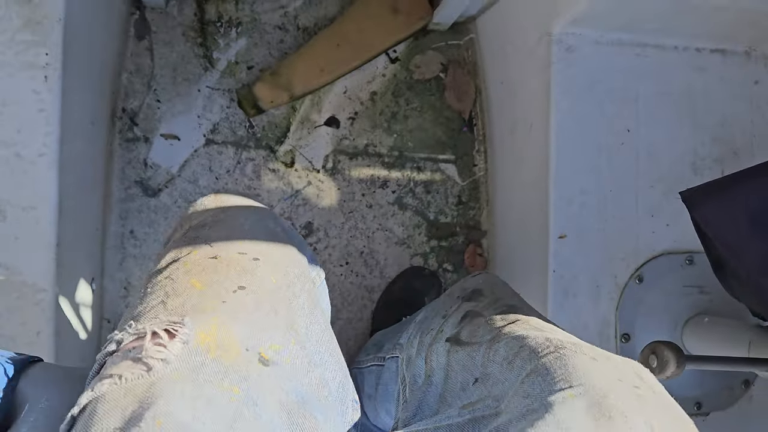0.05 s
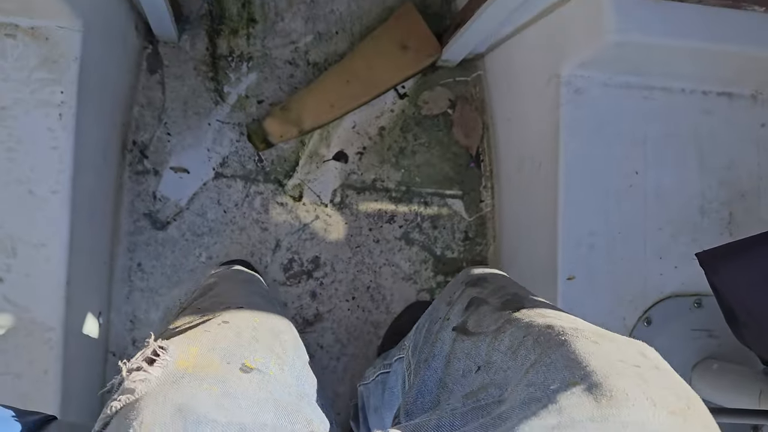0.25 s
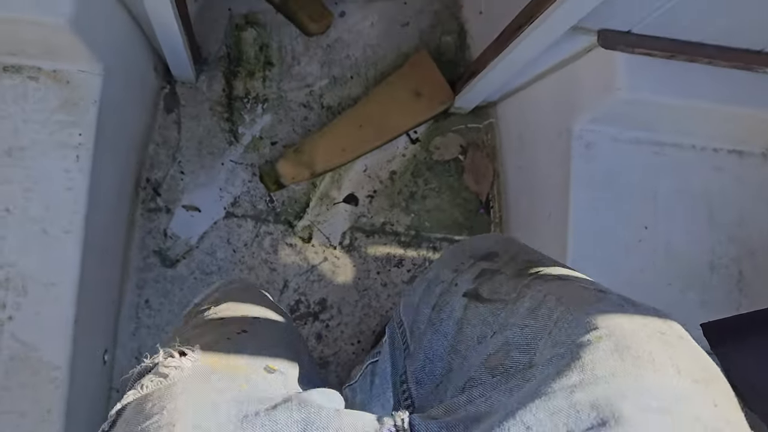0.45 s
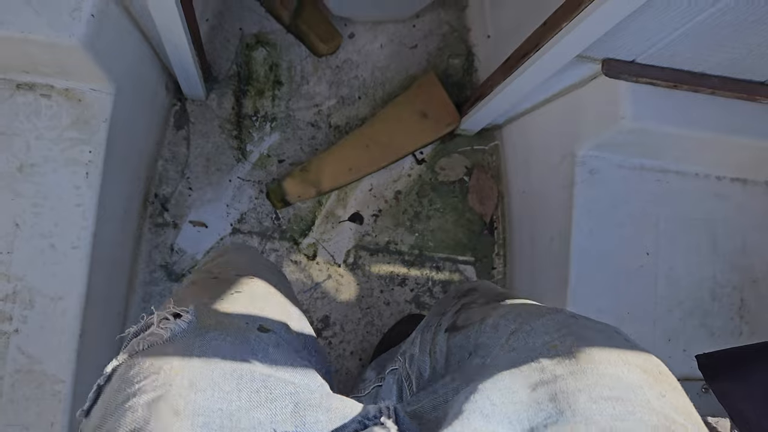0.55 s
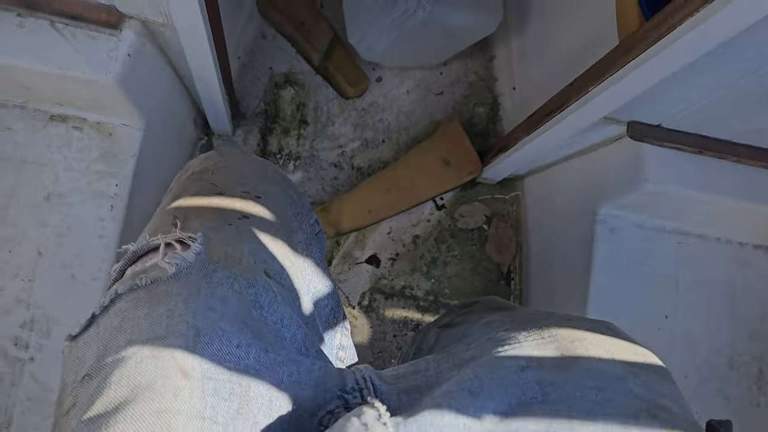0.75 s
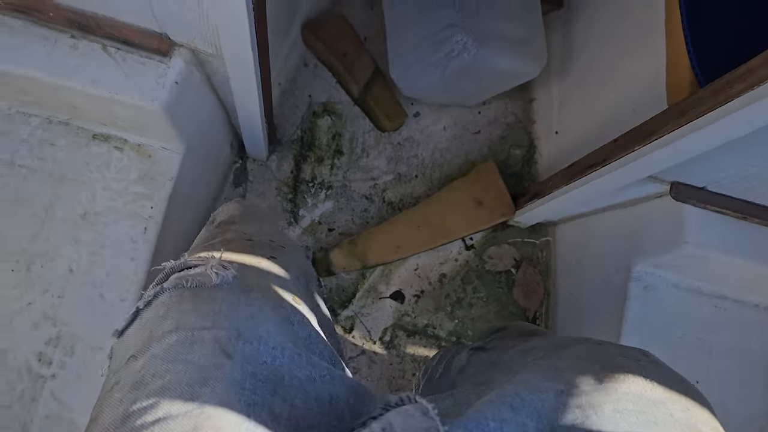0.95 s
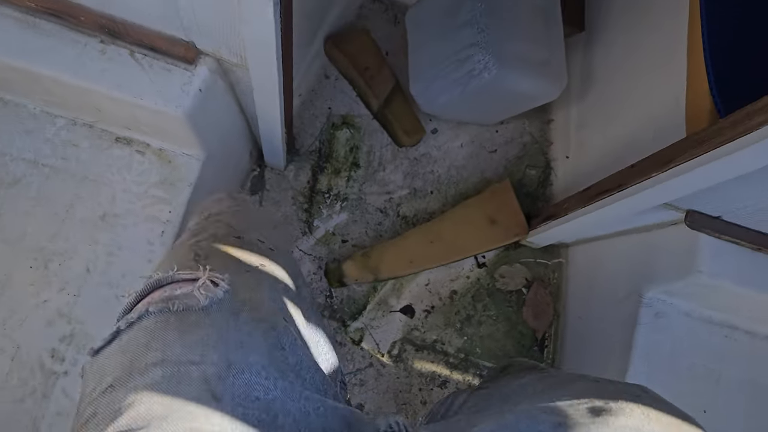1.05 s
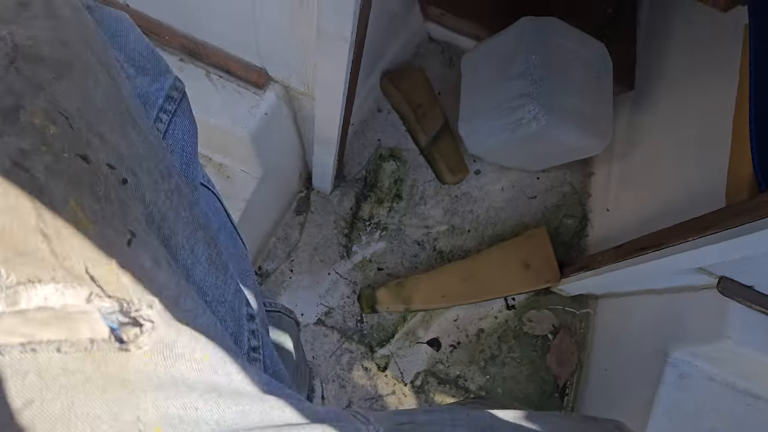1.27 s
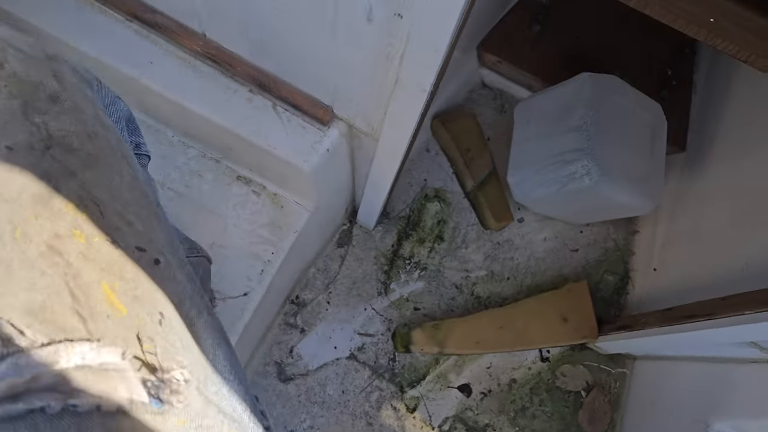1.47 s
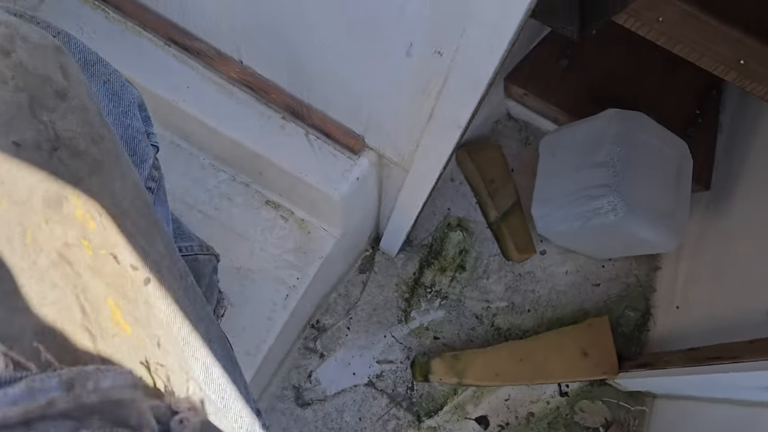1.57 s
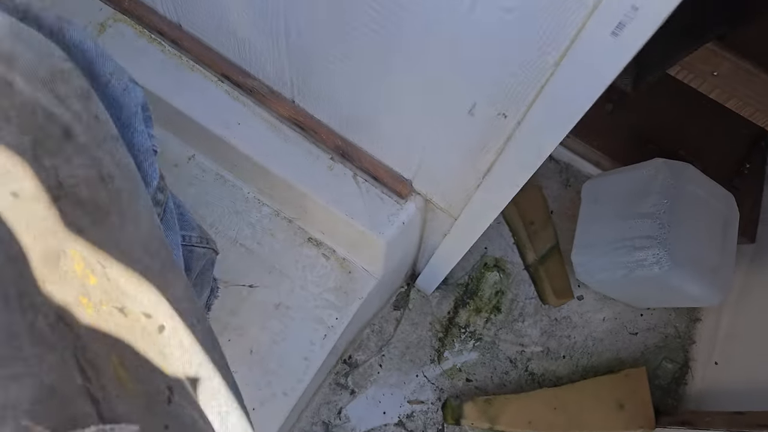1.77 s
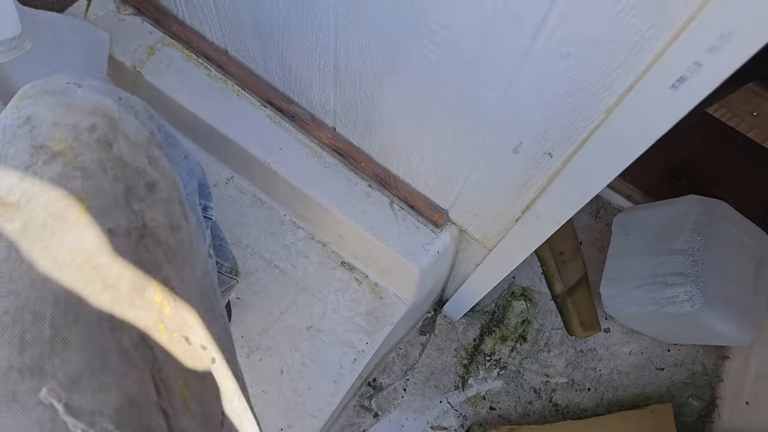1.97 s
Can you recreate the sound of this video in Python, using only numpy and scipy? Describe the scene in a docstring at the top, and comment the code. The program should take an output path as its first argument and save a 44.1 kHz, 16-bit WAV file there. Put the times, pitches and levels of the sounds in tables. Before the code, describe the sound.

Close footsteps knock on a small boat's fiberglass floor, three at an even pace, then two more after a short pause. The hollow hull booms and knocks dully, with light grit, faint trouser swishes and quiet outdoor air.

```python
"""Five footsteps on the hollow fiberglass floor of a small boat, heard from just above, outdoors.
Heel and sole clack on the floor panel and set it ringing, the walker's weight makes it thump,
and the hull booms on, knocking dully as it takes the load. Grit crunches under the later steps,
denim brushes between them, and a low bed of outdoor air lies underneath."""
import sys
import numpy as np
from scipy import signal
from scipy.fft import rfft, irfft, next_fast_len
from scipy.io import wavfile
from scipy.ndimage import uniform_filter1d, minimum_filter1d

SR = 44100
rng = np.random.default_rng(int(sys.argv[2]) if len(sys.argv) > 2 else 0)


def waveform_to_disk(signal):
    """Save audio, clipped to [-1, 1], as 16-bit WAV at the path in sys.argv[1]."""
    frames = np.transpose(np.atleast_2d(signal))
    scaled = np.clip(frames, -1, 1) * 32767
    samples = np.round(scaled).astype(np.int16)
    wavfile.write(sys.argv[1], SR, samples)


N = 88817

# Bands of each footfall's EQ: centre_hz
STEP_BANDS_HZ = [120, 250, 550, 1000, 1700, 3000, 8000]
# Footfalls: start_s, place_wavelengths, heel_snap_gain, sole_delay_s, sole_db, sole_snap_gain,
# panel_db, boom_db, then one strength_db per EQ band
FOOTFALLS = [(0.1975, 0.82, 0.61, 0.0044, 2, 0.42, 9, -11.5, -8, 0.5, -3, -4, -7.5, -2, -7),
             (0.5451, 1.54, 1.3, 0.0044, -8.5, 1, 3, -9, -9.5, -2, -7.5, -8, -1.5, -3, -6.5),
             (0.9005, 2.66, 0.2, 0.011, -2, 1.8, -1.5, 1, 9, 10, 7.5, 3.5, -7, -1.5, -12),
             (1.4865, 3.27, 0.28, 0.0095, -2.5, .5, 3.5, 4.5, 1, 1.5, 3, -4, -17, -7, -14),
             (1.856, 3.33, 0.93, 0.011, -6, 0.16, 4.5, 1.5, 6.5, -3.5, 0, -18, -17.5, -11.5, -9.5)]
def footsteps():
    """Heel, then sole, strike the panel and wake the hull."""
    out = np.zeros((2, N))
    for start_s, place, heel_snap, delay_s, sole_db, sole_snap, panel_db, boom_db, *eq_db in FOOTFALLS:
        colour = np.c_[STEP_BANDS_HZ, eq_db]
        add(out, start_s, clack(colour, heel_snap) + amp(panel_db) * panel_ring(colour, place))
        add(out, start_s + delay_s, amp(sole_db) * clack(colour, sole_snap))
        add(out, start_s, amp(boom_db) * hull_boom())
    return out


# Tone of the floor's clack: freq_hz, gain_db
CLACK_EQ = [(30, 16), (120, 30.5), (250, 27.5), (340, 21), (550, 19), (1000, 17.5), (1400, 28),
            (2000, 25.5), (2900, 15.5), (3900, 10.5), (5200, 1), (7800, 7.5), (10000, -5), (16000, -2)]
# How long the clack rings: freq_hz, t60_s
CLACK_DECAY = [(100, 0.19), (300, 0.1), (800, 0.091), (2000, 0.09), (5000, 0.14), (15000, 0.15)]
def clack(colour, snap, size=16384):
    """One blow on the floor: a crack and snap, then the short dense ring of the fiberglass."""
    def envelope(t, hz):
        attack = 1 - np.exp(-t * hz)  # time constant of one cycle
        body = decay(t, read(CLACK_DECAY, hz))
        tail = amp(-27.5) * decay(t, t60_s=0.27)
        return attack * (body + snap * decay(t, t60_s=0.018) + tail)
    ring = dense_ring(envelope, size)
    ring[:, 0] -= 0.35 * (1 + snap)  # the crack is a single impulse
    hz = bins(ring)
    return equalise(ring, read(CLACK_EQ, hz) + read(colour, hz))


# Floor panel modes: pitch_hz, level_db, t60_s
PANEL_MODES = [(169.94, -12.5, 0.16), (218.1, -14, 0.13), (267.2, -11.5, 0.097), (390.7, -19.5, 0.097),
               (499.4, -21.5, 0.13), (634, -20, 0.07), (686, -24.5, 0.12), (836.5, -19.5, 0.08),
               (945, -24.5, 0.035), (1177, -12.5, 0.066), (1377, -16.5, .09), (1560, -20.5, 0.11),
               (1769, -27, 0.15), (1990, -23.5, 0.16), (2780, -23, 0.086)]
def panel_ring(colour, place, size=16384):
    """The panel's modes swell and die, each as loud as its bending wave is high at the struck place."""
    rise_cycles, reference_hz = 1.3, 100  # place counts bending wavelengths at reference_hz
    t = np.arange(size) / SR
    ring = 0
    for hz, level_db, t60_s in PANEL_MODES:
        coupling = abs(np.cos(2 * np.pi * place * np.sqrt(hz / reference_hz)))
        gain = coupling * amp(level_db + read(colour, hz))
        swell = 1 - np.exp(-t * hz / rise_cycles)
        ring = ring - gain * swell * decay(t, t60_s) * np.sin(2 * np.pi * hz * t)
    return np.array([ring, ring])


# Tone of the hull's rumble: freq_hz, gain_db
BOOM_EQ = [(22, 32), (60, 40.5), (125, 29.5), (190, 31), (290, 18), (420, 12.5), (650, 6.5), (2000, -19.5)]
# How long the rumble hangs on: freq_hz, t60_s
BOOM_DECAY = [(40, 0.7), (80, 0.9), (200, 0.47), (600, 0.55), (2000, 0.25)]
# Resonance of the hull's cavity: pitch_hz, level_db, t60_s
CAVITY_MODES = [(177.93, -21.5, 0.49)]
def hull_boom(size=32768, rise_s=0.013):
    """The hollow hull rumbles on after a load, and its cavity sings."""
    t = np.arange(size) / SR
    swell = 1 - np.exp(-t / rise_s)
    rumble = dense_ring(lambda t, hz: swell * decay(t, read(BOOM_DECAY, hz)), size)
    cavity = sum(amp(db) * decay(t, t60_s) * np.sin(2 * np.pi * hz * t) for hz, db, t60_s in CAVITY_MODES)
    return equalise(rumble, read(BOOM_EQ, bins(rumble))) - swell * cavity


# Low thumps under the walker's weight: peak_s, pitch_hz, half_length_s, level_db
FLOOR_THUMPS = [(0.2352, 46.4, 0.019, -13.5), (0.579, 46.6, 0.035, -13), (0.757, 45.7, 0.028, -25.5),
                (0.934, 41.6, 0.032, -25), (1.067, 58.45, 0.11, -27.5), (1.531, 77.4, 0.021, -9),
                (1.571, 79.6, 0.014, -12), (1.897, 72, 0.019, -15), (1.969, 69.8, 0.042, -20)]
def floor_flex():
    """The floor sags and springs back for a few slow cycles."""
    t = np.arange(N) / SR
    return sum(amp(level_db) * bell_curve(t - peak_s, half_s) * np.cos(2 * np.pi * hz * (t - peak_s))
               for peak_s, hz, half_s, level_db in FLOOR_THUMPS)


# Dull knocks of the hull: start_s, pitch_hz, level_db
HULL_KNOCKS = [(0.077, 300, -15), (.5725, 390, 1), (.586, 160, -3), (1.628, 330, -12), (1.665, 330, -14),
               (1.957, 320, -9)]
# Muffled tone of a knock: pitch_ratio, gain_db
KNOCK_EQ = [(.4, -28), (1, 0), (1.5, -19), (20, -52)]
# Low hull booms, the fading tail of an earlier step, then two soft shifts of weight: start_s, level_db
LOW_BOOMS = [(-.05, -3), (0.289, -8.5), (0.661, -10.5)]
def hull_settling():
    """The hull knocks as it takes the weight, and booms softly in the bass."""
    out = np.zeros((2, N))
    for start_s, pitch_hz, level_db in HULL_KNOCKS:
        colour = np.multiply(KNOCK_EQ, [pitch_hz, 1])
        knock = clack(colour, snap=0, size=8192) + panel_ring(colour, place=0, size=8192)
        add(out, start_s, amp(level_db) * knock)
    lowpass = signal.butter(2, 250, fs=SR, output="sos")
    for start_s, level_db in LOW_BOOMS:
        add(out, start_s, amp(level_db) * signal.sosfilt(lowpass, hull_boom()))
    return out


# Crunches under the sole: peak_s, level_db, attack_s, decay_s, tilt_db_per_octave
GRIT_CRUNCHES = [(0.643, -49, 0.0022, 0.01, -1), (0.912, -24, 0.0059, 0.0124, 3.5),
                 (1.5288, -27, 0.0026, 0.0034, 1), (1.538, -34.5, 0.003, 0.017, -0.5),
                 (1.593, -46, 0.015, 0.03, -2.5), (1.868, -28.5, 0.0006, 0.0049, -1.5),
                 (1.9008, -27, .0005, 0.004, -3), (1.9097, -31, .0006, 0.0052, -1.5),
                 (1.930, -33.5, 0.0012, 0.008, 5.5)]
# Tone of the grit before the tilt: freq_hz, gain_db
GRIT_EQ = [(300, -1.5), (2600, 4.5), (5800, -3), (8000, 1), (10000, -10.5), (14000, -2.5)]
def grit(grains_per_s=7000):
    """Bursts of tiny grains crushed under the shoe; the finer the grit, the brighter the burst."""
    t, out = np.arange(N) / SR, 0
    hz, eq_db = np.transpose(GRIT_EQ)
    for peak_s, level_db, attack_s, decay_s, tilt in GRIT_CRUNCHES:
        grains = (rng.random(N) < grains_per_s / SR) * rng.standard_normal((2, N))
        pressure = np.exp(-np.maximum((peak_s - t) / attack_s, (t - peak_s) / decay_s))
        out = out + amp(level_db) * pressure * shaped(grains, np.c_[hz, eq_db + tilt * np.log2(hz)])
    return out


# Trouser swishes: peak_s, half_length_s, rub_db, resonance_hz, hiss_db
DENIM_SWISHES = [(0.077, 0.42, -61.5, 2100, -75), (0.331, 0.076, -53.5, 1750, -58.5),
                 (0.875, 0.079, -47.5, 1630, -61.5), (1.178, 0.12, -63, 1630, -64.5),
                 (1.399, 0.11, -59, 2080, -53), (1.791, 0.028, -61.5, 2060, -55),
                 (1.933, 0.13, -47.5, 2190, -55.5)]
# Dark body of the rub: freq_hz, gain_db
RUB_EQ = [(200, 1.5), (900, -6), (2300, -14.5), (4500, -17), (16000, -49.5)]
# Bright hiss of the cloth: freq_hz, gain_db
HISS_EQ = [(300, -12), (4500, 2), (6000, -5), (8200, 6), (10000, -6.5), (15000, 1)]
def denim(boost_db=14, half_width_hz=170):
    """Trouser legs rub with one narrow resonance and hiss as they swing."""
    t, out = np.arange(N) / SR, 0
    hz = bins(t)
    hiss = shaped(rng.standard_normal((2, N)), HISS_EQ)
    for peak_s, half_s, rub_db, resonance_hz, hiss_db in DENIM_SWISHES:
        resonance_db = boost_db / (1 + ((hz - resonance_hz) / half_width_hz) ** 2)
        rub = shaped(rng.standard_normal((2, N)), np.c_[hz, read(RUB_EQ, hz) + resonance_db])
        out = out + bell_curve(t - peak_s, half_s) * (amp(rub_db) * rub + amp(hiss_db) * hiss)
    return out


# Tone of the open air: freq_hz, gain_db
AIR_EQ = [(20, -2.5), (45, -2.5), (100, -9), (300, -21), (600, -25), (1100, -36.5), (2000, -31.5),
          (3200, -42), (16000, -49)]
def outdoor_air(level_db=-45.5):
    """A steady, bass-heavy bed of noise."""
    return amp(level_db) * shaped(rng.standard_normal((2, N)), AIR_EQ)


# How alike left and right are: freq_hz, coherence_ratio
STEREO_COHERENCE = [(100, .99), (500, 0.95), (2000, 0.94), (4000, 0.11), (12000, 1)]
def stereo_pair(noise):
    """Blends two unrelated noises to set their stereo width at each frequency."""
    left, other = rfft(noise)
    coherence = np.clip(read(STEREO_COHERENCE, bins(noise)), 0, 1)
    right = coherence * left + np.sqrt(1 - coherence ** 2) * other
    return irfft(np.array([left, right]), noise.shape[-1])


def dense_ring(envelope, size):
    """Countless overlapping modes: each band follows envelope(t, hz) and has the same energy per Hz."""
    noise = stereo_pair(rng.standard_normal((2, size)))
    t, spectrum, out = np.arange(size) / SR, rfft(noise), 0
    centres_hz = np.geomspace(35, 14000, 16)
    for hz, solo in zip(centres_hz, np.eye(len(centres_hz))):
        band = read(np.c_[centres_hz, solo], bins(noise))
        ring = irfft(spectrum * band) * envelope(t, hz)
        out = out + unit_rms(ring) * np.sqrt(np.mean(band ** 2) / size)
    return out


def shaped(noise, eq):
    """Stereo noise of rms 1 with the tone of the given EQ curve."""
    size = noise.shape[1]
    padded = np.pad(noise, ((0, 0), (0, next_fast_len(size, True) - size)))
    spectrum = rfft(stereo_pair(padded)) * amp(read(eq, bins(padded)))
    return unit_rms(irfft(spectrum, padded.shape[1])[:, :size])


def equalise(x, gain_db):
    """Minimum-phase EQ with one gain for every bin of x."""
    log_gain = np.log(amp(np.r_[gain_db, gain_db[-2:0:-1]]))
    response = np.exp(np.conj(signal.hilbert(log_gain)))[:len(gain_db)]
    return irfft(rfft(x) * response)


def read(curve, hz):
    """A curve's value at hz, on a log-frequency axis."""
    points_hz, values = np.transpose(curve)
    return np.interp(np.log(hz + 1), np.log(points_hz + 1), values)


def add(mix, start_s, sound):
    """Mixes a sound in, trimming whatever falls outside the mix."""
    at = round(start_s * SR)
    sound = sound[:, max(-at, 0):]
    part = mix[:, max(at, 0):][:, :sound.shape[1]]
    part += sound[:, :part.shape[1]]


def decay(t, t60_s):
    return np.exp(-np.log(1000) * t / t60_s)


def bell_curve(t, half_s):
    return np.exp(-(t / half_s) ** 2)


def amp(db):
    return 10 ** (np.asarray(db) / 20)


def unit_rms(x):
    return x / np.sqrt(np.mean(x ** 2) + 1e-20)


def bins(x):
    return np.fft.rfftfreq(x.shape[-1], 1 / SR)


def scene():
    """The steps and the boat's answer, with grit, cloth and air behind them."""
    return footsteps() + hull_settling() + floor_flex() + grit() + denim() + outdoor_air()


# Level between the two microphone ports: freq_hz, left_minus_right_db
STEREO_BALANCE = [(100, 0), (700, 0), (1400, -4), (2300, -6), (3300, -2.5), (5500, 3), (8000, -2),
                  (13000, 2.5)]
# Phase between the ports: freq_hz, left_lead_rad
STEREO_PHASE = [(100, 0.17), (500, 0.5), (1200, 1.54), (4000, 1.7)]
def record(dry):
    """Each port gets its own level and phase; a limiter holds the peaks; a low-pass trims the top."""
    ceiling, limiter_s, cutoff_hz = 0.95, 0.0032, 16100
    padded = np.pad(dry, ((0, 0), (0, next_fast_len(2 * N) - N)), mode="reflect")
    hz, side = bins(padded), np.array([[0.5], [-0.5]])
    ports = amp(side * read(STEREO_BALANCE, hz)) * np.exp(1j * side * read(STEREO_PHASE, hz))
    stereo = irfft(rfft(padded) * ports, padded.shape[1])[:, :N]
    span = round(limiter_s * SR)
    needed_gain = ceiling / np.maximum(abs(stereo).max(0), ceiling)
    smooth_gain = uniform_filter1d(minimum_filter1d(needed_gain, span), span)
    lowpass = signal.firwin(255, cutoff_hz, window=("kaiser", 9), fs=SR)
    return signal.oaconvolve(stereo * smooth_gain, lowpass[None], "same")


dry = scene()
out = record(dry)
waveform_to_disk(out)
```